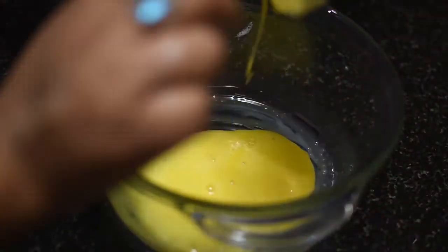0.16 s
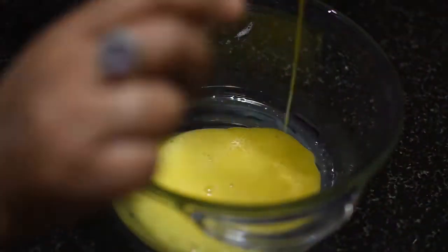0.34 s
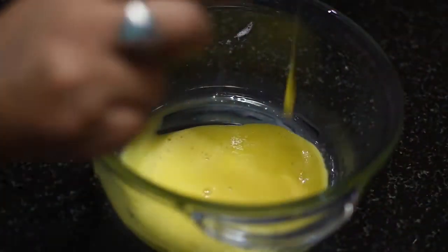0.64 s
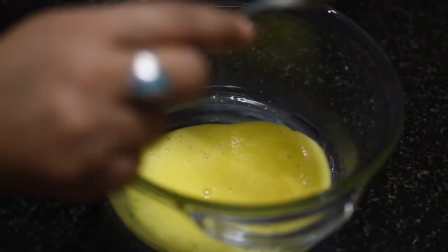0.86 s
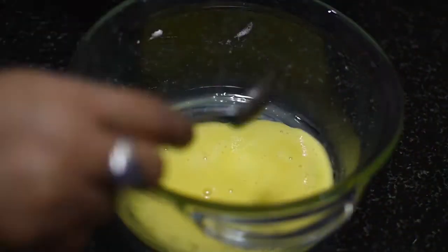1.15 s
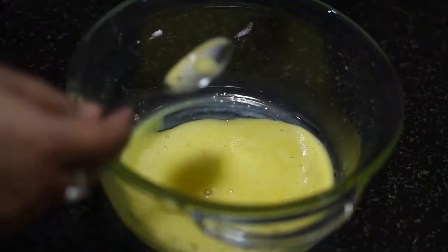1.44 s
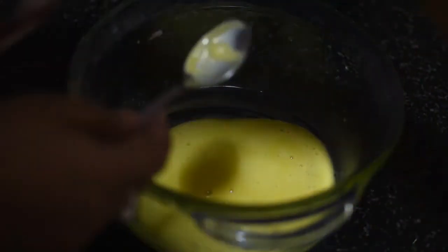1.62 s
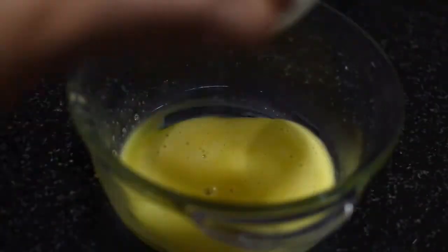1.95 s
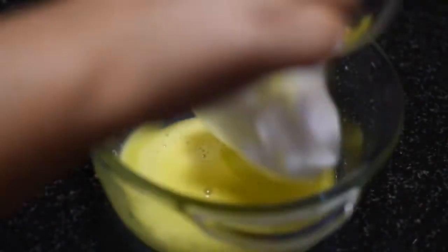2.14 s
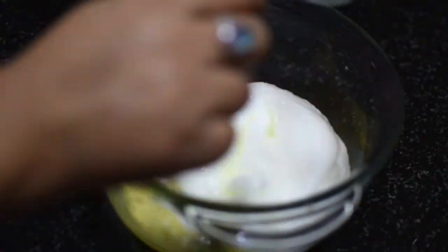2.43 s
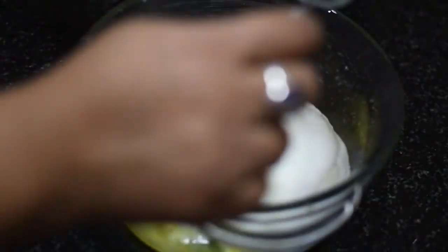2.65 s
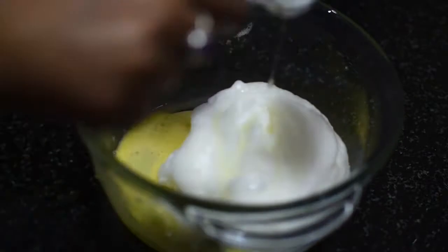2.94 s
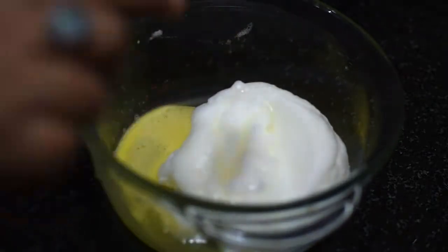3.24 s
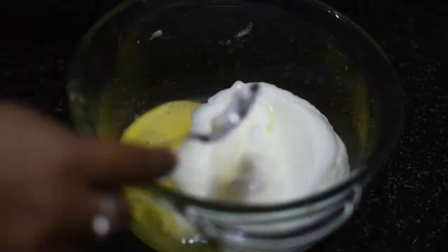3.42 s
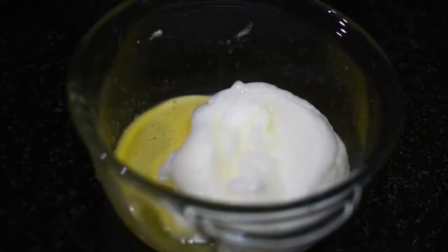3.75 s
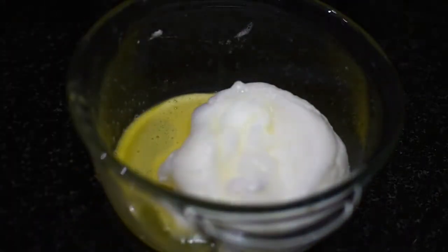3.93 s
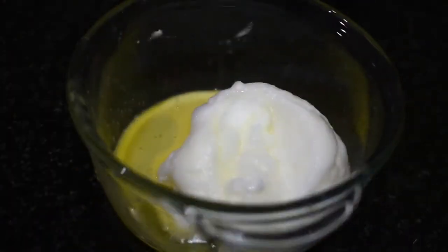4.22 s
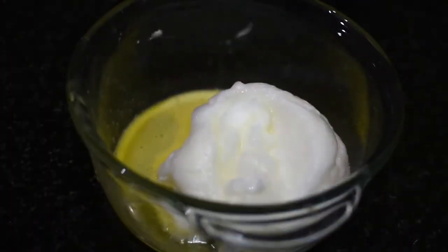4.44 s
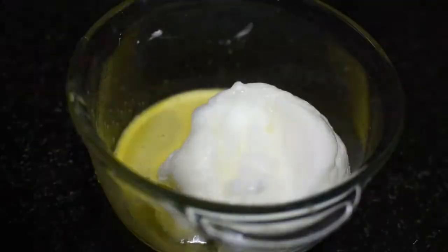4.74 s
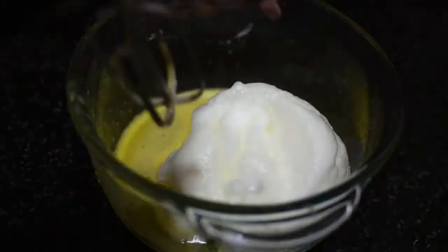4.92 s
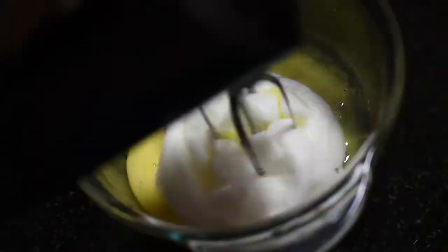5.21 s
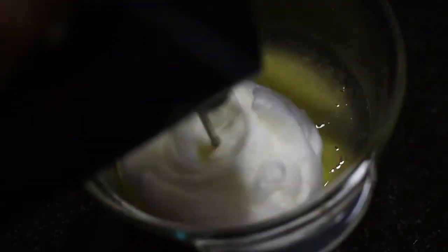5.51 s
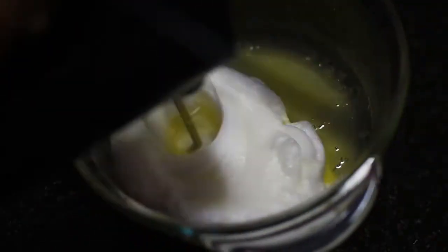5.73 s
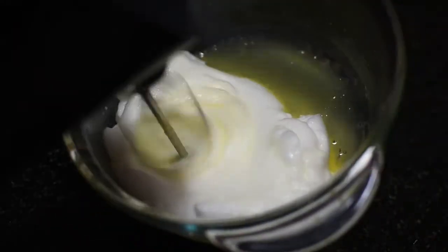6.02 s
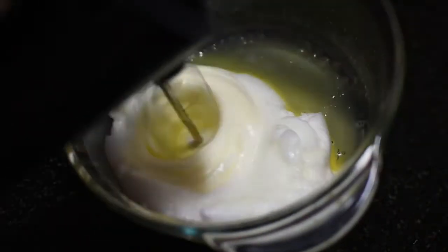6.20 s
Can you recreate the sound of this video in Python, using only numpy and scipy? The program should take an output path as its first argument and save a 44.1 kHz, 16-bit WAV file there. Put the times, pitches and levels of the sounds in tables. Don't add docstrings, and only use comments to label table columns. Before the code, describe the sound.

A hand mixer's buzz stops almost at once, followed by a dense, bright rattle of a spoon in a cup. After a near-quiet gap with small bowl taps come softer dish scrapes and clinks, then hard hollow beater knocks and ringing glass. The mixer finally revs up to a high whine. Close, dry kitchen sound over faint hum, chopped into tiny slices like fast-forward.

```python
import sys
import numpy as np
from scipy import signal
from scipy.fft import rfft, irfft, next_fast_len
from scipy.io import wavfile
from scipy.ndimage import uniform_filter1d, minimum_filter1d, map_coordinates

SR = 44100
rng = np.random.default_rng(int(sys.argv[2]) if len(sys.argv) > 2 else 0)


def gain_from_db(level_db):
    decades = np.asarray(level_db, float) / 20
    return 10 ** decades


def wav_record(signal):
    frames = np.transpose(np.atleast_2d(signal))
    bounded = np.clip(frames, -1, 1)
    quanta = np.round(bounded * 32767).astype(np.int16)
    wavfile.write(sys.argv[1], SR, quanta)


N = 280917

# start_s, level_db, body_db, sheen_db, loss_at_each_cut_db
CUP_TOUCHES = [(0.132, -33, 0, -1, 2), (0.143, -29, 2.5, -1, 14), (0.227, -33.5, -2, -9.5, 20.5),
               (0.287, -26, -9, -7.5, 11), (0.359, -31.5, 6.5, 3.5, 25.5), (0.396, -41.5, 6, -5, 9),
               (0.468, -33, 8.5, 7.5, 14.5), (0.568, -25, -1.5, -6.5, 9.5), (0.625, -27, -7, -5.5, 10),
               (0.712, -28, -10, -1, 0), (0.724, -25, -6, 0, 0), (0.734, -21, -5, 0, 0),
               (0.75, -25, -5, 0, 12), (0.801, -39, -1, -3, 3), (0.849, -28, 5, -1.5, 13),
               (0.935, -33, 2, 6, 13), (1.023, -40.5, 1.5, 2, 8), (1.109, -42.5, 1, -2.5, -4),
               (1.139, -38, 3, -1, 20.5), (1.199, -41, 3, -3, 4), (1.213, -37.5, 3.5, 3, 13.5),
               (1.287, -45.5, 3, 3.5, 12.5)]
DISH_TOUCHES = [(2.303, -51, 0, -5, 7), (2.434, -58, -5, -2, 3), (2.478, -47, 3, -3, 8),
                (2.523, -38, 1, -12, 11), (2.573, -37.5, 7, 3.5, 12), (2.656, -44, 3, 0.5, 9.6),
                (2.745, -40, 0.5, -2, 9.7), (2.82, -48, 1, -7, 2.5), (2.876, -48, 10, -20, 2),
                (2.901, -44.5, 9.5, -2, 10), (2.966, -41.5, 5.5, -8, 2.7), (3.016, -31, 2.5, -2, 13),
                (3.099, -38, 3, -0.5, 12), (3.186, -29, -3, -10, 9.1), (3.325, -33, 2, 6, 14.5),
                (4.069, -34.5, -7.5, 0.5, 12.6)]
BEATER_TOUCHES = [
    (4.158, -27.5, 8, -10.5, 2),
    (4.177, -18, 4.1, -17, 6.2),
    (4.248, -21, 5.7, -9, 9.8),
]
BOWL_TOUCHES = [(1.596, -36.5, 6, -15, 11.6), (1.683, -31.5, 11, -33, 15.6), (1.95, -52, 8, -12, 12),
                (4.534, -33, -5, -25, 41), (4.572, -45, 12, -5, 2), (4.602, -33, -2, -11, 11.2),
                (4.686, -44, 5, -17, 8), (4.732, -27, 6.5, -8, 2), (4.777, -28, 5.5, 1, 9.5)]
# pitch_hz, width_hz, level_db
CUP_RING = [(2970, 400, -1), (5540, 410, 2.5), (8600, 326, -13)]
DISH_RING = [(2460, 370, -6), (4150, 290, -10), (6650, 300, -7)]
BEATER_RING = [(800, 48, -1.5), (2335, 150, -17.5)]
BOWL_RING = [(1400, 44, -2.5)]
# pitch_hz, level_db (per Hz)
CUP_COLOUR = [(180, -50), (350, -42), (850, -25), (1150, -7.5), (4800, -4), (7300, -12), (9800, -12),
              (12000, -31.5)]
DISH_COLOUR = [(180, -55), (350, -36), (720, -23), (1100, -3.5), (2360, -4), (6000, -7.5), (9500, -13.5),
               (12000, -30)]
BEATER_COLOUR = [(120, -48), (200, -15), (1310, 3), (3300, -26.5), (5340, -27.5), (10000, -26),
                 (12000, -57)]
BOWL_COLOUR = [(120, -66), (200, -28), (1410, -10), (3660, -28.5), (9070, -33.5), (12000, -48)]
# start_s, pitch_hz, level_db
CUP_NOTES = [(0.142, 1127, -33), (0.227, 1120, -40), (0.286, 5760, -29), (0.316, 1127, -40),
             (0.357, 9460, -42), (0.468, 1587, -38), (0.468, 9450, -33), (0.625, 1363, -37),
             (0.625, 5520, -35.5), (0.625, 8500, -42), (0.801, 9500, -49), (0.848, 2875, -36),
             (0.933, 4900, -39), (0.286, 2870, -36), (0.625, 3100, -40), (0.567, 9500, -40),
             (0.933, 5500, -38), (0.712, 5550, -30), (0.712, 6760, -34), (0.712, 8300, -41),
             (0.73, 3980, -29), (0.738, 5600, -23.5), (0.738, 8400, -32.5), (0.848, 1370, -35.5),
             (0.847, 9460, -35), (1.022, 5300, -40), (1.109, 1366, -39), (1.109, 5540, -37.5),
             (1.213, 3300, -31), (1.213, 8470, -44), (1.286, 1350, -40.5), (1.286, 3180, -41)]
DISH_NOTES = [(2.876, 830, -40), (2.89, 1150, -41), (2.966, 850, -45), (2.966, 3900, -45),
              (2.966, 2300, -45), (3.097, 2000, -41), (3.097, 6900, -45), (3.186, 5200, -40),
              (3.186, 2300, -39), (4.068, 1000, -43), (2.82, 3900, -50), (2.573, 960, -36),
              (2.573, 2377, -25), (2.573, 6470, -41), (2.656, 6380, -46.5), (2.745, 2300, -39),
              (2.745, 4100, -43), (2.524, 2380, -40), (2.524, 6450, -48), (2.573, 4200, -42),
              (2.966, 8700, -57), (2.573, 9100, -46), (2.66, 1850, -46), (2.743, 6650, -37),
              (2.901, 5430, -49), (3.097, 1042, -43.5), (3.185, 1508, -38.5), (3.186, 6500, -38),
              (3.186, 4400, -38), (3.016, 3500, -37), (3.324, 1128, -32), (3.324, 4170, -31),
              (3.324, 1400, -34), (3.323, 6610, -27), (3.324, 2620, -34), (3.323, 9180, -35.5),
              (3.324, 5190, -34), (4.068, 6750, -35.5), (4.602, 5620, -40), (2.656, 10000, -49)]
BEATER_NOTES = [(4.158, 2400, -36), (4.184, 1300, -27), (4.177, 6830, -34.5), (4.177, 10300, -37.5),
                (4.207, 1140, -28), (4.247, 1100, -25), (4.27, 1250, -26), (4.187, 1330, -24),
                (4.247, 800, -28), (4.158, 800, -32), (4.29, 1133, -27.5)]
BOWL_NOTES = [(1.683, 1420, -32), (1.683, 500, -40), (1.596, 520, -46), (4.73, 860, -33), (4.73, 500, -36),
              (4.777, 460, -36), (4.777, 680, -38), (4.535, 4500, -51), (1.596, 1390, -39),
              (1.6, 5700, -50), (4.572, 1480, -36), (4.602, 6900, -52), (4.572, 5800, -50),
              (4.602, 3300, -43), (4.742, 8050, -36), (4.78, 5780, -34), (4.745, 1385, -23),
              (4.745, 3245, -31), (4.746, 5780, -22), (4.742, 7380, -35), (4.746, 8880, -31),
              (4.796, 1387, -17.5)]
# start_s, pitch_hz, level_db
LINGERING_NOTES = [(2.745, 2380, -36.5), (3.324, 4150, -32), (4.26, 4300, -29), (4.247, 6720, -31),
                   (4.772, 3250, -27), (4.796, 3260, -23), (4.776, 5790, -29), (4.78, 8880, -47),
                   (.625, 5530, -40), (.76, 3750, -42), (.76, 2870, -42)]
# start_s, peak_db, knock_hz, clink_hz, clink_db
BLOWS = [(0.131, 4, 1390, 4460, -14.5), (0.143, -9, 1140, 2760, 0), (0.285, -8, 1750, 5660, 0.5),
         (0.398, -17.5, 1930, 3370, 3.5), (0.466, -5, 1110, 3610, -6.5), (0.5663, -3, 1090, 2735, -7),
         (0.7405, -8, 1850, 4000, -2), (0.749, -11, 2800, 5600, 0), (1.143, -22, 1900, 5500, -4),
         (0.848, 2, 1238, 2875, -5), (2.575, -10, 2335, 6530, -6.5), (2.822, -21, 1100, 3880, -12),
         (2.902, -20, 869, 2550, -1.5), (3.014, -3, 1400, 2616, -4), (3.322, -8, 1410, 2660, -1),
         (4.177, 0, 1270, 2790, -10), (4.534, -32, 1480, 3000, -8), (4.6875, -20, 1380, 3190, -4),
         (4.749, -3, 1390, 3300, -11.5), (4.764, 2, 1400, 3240, -16.5), (5.137, -34, 1750, 2850, -11),
         (5.179, -30, 1730, 3150, -7.5)]
# start_s, pitch_hz, peak_db
CHIMES = [(.131, 3090, -18), (.131, 5577, -20), (.131, 6040, -22), (.131, 2035, -22), (.142, 1906, -20),
          (.2857, 2864, -10), (.2857, 4124, -16), (.2857, 5512, -12), (.2857, 2186, -20),
          (.2857, 8204, -23), (.2857, 1227, -21), (.397, 3919, -25), (.466, 9410, -17), (.466, 1453, -20),
          (.466, 4264, -22), (.466, 4759, -23), (.466, 6800, -26), (.5663, 1906, -18), (.5663, 3790, -19),
          (.5663, 3305, -20), (.5663, 9528, -18), (.5663, 1464, -19), (.848, 5136, -19), (.848, 3564, -20),
          (.848, 9421, -22), (1.684, 1389, -14), (1.684, 1023, -21), (1.684, 3165, -26), (1.684, 2239, -24),
          (2.574, 947, -15), (2.572, 1400, -23), (2.567, 10200, -36), (3.014, 1055, -18),
          (3.014, 1906, -17), (3.014, 3488, -19), (3.014, 3898, -22), (3.3224, 6740, -13),
          (3.3224, 4188, -15), (3.3224, 9227, -19), (3.3224, 1087, -18), (3.3224, 5308, -21),
          (4.177, 1755, -6), (4.177, 2358, -10), (4.177, 660, -4), (4.211, 1250, -12), (4.217, 1100, -14),
          (4.23, 1200, -13), (4.279, 1260, -10), (4.298, 1150, -20), (4.317, 1200, -22), (4.535, 3144, -31),
          (4.535, 3865, -35), (4.749, 5782, -18), (4.749, 8882, -21), (4.733, 1560, -18), (4.764, 883, -17),
          (4.764, 2250, -17), (.739, 4410, -14)]
# start_s, peak_db, pitch_hz, t60_s
THUDS = [(0.368, -30, 130, 0.13), (0.89, -31, 131, 0.15), (1.95, -33, 178, 0.11), (2.48, -31, 334, 0.2),
         (2.497, -30, 320, .13), (4.174, -16, 183, 0.033), (4.597, -30.5, 274, 0.13),
         (4.776, -23, 285, 0.16), (4.735, -22, 520, .2), (2.6, -38, 110, .2), (2.88, -36, 400, .12)]
# start_s, peak_db, length_s
JOLT = (4.176, -26, .005)
# time_s, turns_per_s
SHAFT_SPEED = [(5.79, 58), (5.814, 125), (5.834, 160), (5.837, 250), (5.881, 267), (5.883, 306),
               (5.923, 314), (5.925, 330), (5.976, 348), (6.03, 359.5), (6.108, 368.3), (6.2, 372.5),
               (6.37, 379)]
# on_s, off_s, gear_noise_db, whine_db, octave_db, shaft_tone_db
MIXER_RUNS = [
    (-.01, .097, -16.5, -29, -36.5, -19.5),
    (5.789, 6.4, -17.2, -24.5, -50, -22.5),
]
# pitch_hz, width_hz, level_db
SHELL_RING = [(600, 50, -4), (748, 45, -4), (1250, 67, -1.5), (1750, 92, -1), (2335, 70, 0),
              (2880, 230, -5.5)]
# pitch_hz, level_db (per Hz)
GEAR_COLOUR = [(88, -70), (150, -47), (295, -10.5), (367, -10.5), (464, 0), (753, -0.5), (2040, -1.5),
               (2330, 1.5), (5000, -16.5), (6500, -42), (11000, -120)]
HISS_COLOUR = [(2240, -40.5), (3800, -8), (4340, -10.5), (9160, -24.5), (11000, -31.5), (11900, -48),
               (15500, -65), (22000, -120)]
# pitch_hz, width_hz, lift_db
VENT = (5800, 2200, 22)
GRILLE = (2500, 2200, 18)
SIDE_TONES_DB = (-20, -14)
# pitch_hz, level_db, t60_s
SWITCH_JOLT = [
    (770, 1.5, 0.1),
    (1059, -11, 0.079),
    (1290, -11, 0.061),
]
# start_s, pitch_hz, level_db
SHELL_NOTES = [(5.792, 620, -25), (5.83, 2920, -22), (5.794, 1500, -32), (5.794, 2950, -37),
               (5.794, 3900, -43), (5.812, 1250, -29), (5.794, 2370, -32), (5.856, 5250, -30),
               (5.836, 1790, -24), (5.856, 600, -27), (5.884, 1245, -28)]
# pitch_hz, level_db (per Hz)
HUM_COLOUR = [(12, -50.5), (25, -30.5), (51, -11), (114, -2), (184, 1), (254, -5), (300, 0), (520, -1.5),
              (1560, -6), (4000, -19.5), (7500, -35), (12000, -46.5)]
# pitch_hz, likeness (0 to 1)
LIKENESS = [(60, 1), (170, 0.98), (490, 0.99), (1400, 0.98), (4010, 0.89), (11500, 0.57)]

FULL_SPEED = 386.5
HISS_DB = -21.5
HISS_DB_PER_OCTAVE, TONE_DB_PER_OCTAVE = 11, 26.5
STRAIN_DB, STALL_DB = 32, 59
INRUSH_DB = 3
BLOW_T60, CHIME_T60 = 0.032, 0.04
BODY_SPARED, SHEEN_EXTRA = 0.14, 0.191
FIRST_CUT_S, SLICE_S, FADE_S = 0.094, 0.04417, 0.003

TIME = np.arange(N) / SR
SHORT_TIME = np.arange(SR // 5) / SR
CUTS_PASSED = uniform_filter1d(np.floor((TIME - FIRST_CUT_S) / SLICE_S), size=round(FADE_S * SR))


def unit(x):
    return x / np.sqrt(np.mean(x ** 2) + 1e-20)


def along(points, hz):
    f, v = np.transpose(points)
    return np.interp(np.log(hz + 1), np.log(f + 1), v)


def wobble(rate):
    knots = rng.standard_normal(int(N * rate / SR) + 4)
    return map_coordinates(knots, [TIME * rate])


def colour_gain(colour):
    return lambda hz: gain_from_db(along(colour, hz))


def resonant(colour, ring, ring_db):
    def gain(hz):
        power = gain_from_db(2 * along(colour, hz))
        for centre, width, db in ring:
            power = power + gain_from_db(2 * (db + ring_db)) / (1 + (2 * (hz - centre) / width) ** 2) ** 2
        return np.sqrt(power)
    return gain


def rush(gain):
    m = next_fast_len(N + 8192)
    hz = np.fft.rfftfreq(m, 1 / SR)
    turn = np.arccos(np.clip(along(LIKENESS, hz), -1, 1)) / 2
    spectrum = rfft(rng.standard_normal((2, m))) * gain(hz)
    mid, side = irfft(spectrum * [np.cos(turn), np.sin(turn)], m)[:, :N]
    return unit(np.array([mid + side, mid - side]))


def patchy(x, depth_db):
    z = signal.stft(x, nperseg=512)[2]
    field = uniform_filter1d(rng.standard_normal(z.shape[1:]), size=4, axis=0)
    field = uniform_filter1d(field, size=8, axis=1)
    gain = unit(gain_from_db(depth_db * unit(field)))
    return signal.istft(z * gain, nperseg=512)[1][:, :N]


def damped(hz, db, t60, t):
    return gain_from_db(db - 60 * t / t60) * np.sin(2 * np.pi * hz * t)


def add(track, s, sound):
    i = round(s * SR)
    track[..., i:i + sound.shape[-1]] += sound


def ageing(s, until, drift=0.39):
    i = round((s - FADE_S / 2) * SR)
    n = round((min(until - s, 5 * SLICE_S) + FADE_S) * SR)
    t = TIME[:n]
    cuts = np.clip(CUTS_PASSED[i:i + n] - CUTS_PASSED[i + round(2 * FADE_S * SR)], 0, None)
    window = np.sqrt(np.clip(np.minimum(t, t[-1] - t) / FADE_S, 0, 1))
    return window, cuts + drift * t / SLICE_S


def clatter(touches, colour, ring, ring_db, rattle_db):
    def over(hz, edge_hz):
        return 1 / np.sqrt(1 + (edge_hz / (hz + 1)) ** 12)
    m = next_fast_len(N)
    hz = np.fft.rfftfreq(m, 1 / SR)
    spectrum = rfft(patchy(rush(resonant(colour, ring, ring_db)), depth_db=2.5), m)
    bands = over(1930, hz), over(hz, 2390) * over(4090, hz), over(hz, 4650)
    pace = np.array([[1 - BODY_SPARED], [1], [1 + SHEEN_EXTRA]])
    levels = np.zeros((3, N))
    ends = [touch[0] for touch in touches[1:]] + [7]
    for (s, db, body_db, sheen_db, loss_db), until in zip(touches, ends):
        window, age = ageing(s, until)
        band_db = db + np.array([[body_db], [0], [sheen_db]])
        add(levels, s - FADE_S / 2, window * gain_from_db(band_db - loss_db * pace * age))
    rattle = unit(gain_from_db(rattle_db * wobble(150)))
    return rattle * sum(level * unit(irfft(spectrum * band, m)[:, :N])
                        for level, band in zip(levels, bands))


def singing(notes, width_hz, steady, loss_db):
    track = np.zeros((2, N))
    all_knots = rng.standard_normal((len(notes), 4, 240))
    for (s, hz, db), knots in zip(notes, all_knots):
        window, age = ageing(s, 7, drift=0.3)
        t = TIME[:len(age)]
        a, b, c, d = (map_coordinates(k, [t * width_hz * (hz / 2500) ** 0.4 + 2]) for k in knots)
        apart = np.sqrt(np.clip(1 - along(LIKENESS, hz), 0, 1) / 2)
        shake = steady + np.sqrt(1 - steady ** 2) * (a + 1j * b) * 0.73
        shake = shake + apart * (c + 1j * d) * np.array([[0.75], [-0.75]])
        tone = np.sqrt(2) * np.real(shake * np.exp(2j * np.pi * hz * t))
        add(track, s - FADE_S / 2, window * gain_from_db(db + 3.5 - loss_db * age) * tone)
    return track


def cup():
    return (clatter(CUP_TOUCHES, CUP_COLOUR, CUP_RING, ring_db=2, rattle_db=2.2)
            + singing(CUP_NOTES, width_hz=250, steady=0.3, loss_db=18.5))


def dish():
    return (clatter(DISH_TOUCHES, DISH_COLOUR, DISH_RING, ring_db=5.5, rattle_db=2.45)
            + singing(DISH_NOTES, width_hz=280, steady=0.3, loss_db=19.5))


def beaters():
    return (clatter(BEATER_TOUCHES, BEATER_COLOUR, BEATER_RING, ring_db=4, rattle_db=0.5)
            + singing(BEATER_NOTES, width_hz=169, steady=0.55, loss_db=14))


def bowl():
    return (clatter(BOWL_TOUCHES, BOWL_COLOUR, BOWL_RING, ring_db=0.5, rattle_db=1.5)
            + singing(BOWL_NOTES, width_hz=105, steady=0.55, loss_db=18))


def lingering_notes():
    return singing(LINGERING_NOTES, width_hz=90, steady=0.7, loss_db=11)


def blows():
    track, t = np.zeros((2, N)), SHORT_TIME
    crack = rush(colour_gain(CUP_COLOUR))
    rise = (1 - np.exp(-t / 0.0002)) * (1 + 0.8 * np.exp(-t / 0.0012))
    for s, db, knock_hz, clink_hz, clink_db in BLOWS:
        knock = damped(knock_hz, -8, BLOW_T60, t)
        clink = damped(clink_hz, clink_db - 8.5, 0.96 * BLOW_T60, t)
        crack_fade = gain_from_db(clink_db - 8 - 60 * t / (0.82 * BLOW_T60))
        burst = crack_fade * crack[:, round(s * SR):][:, :len(t)]
        add(track, s, gain_from_db(db) * rise * (knock + clink + burst))
    for s, hz, db in CHIMES:
        add(track, s, rise * damped(hz, db, CHIME_T60, t))
    no_bass = signal.butter(4, 850, "high", fs=SR, output="sos")
    return signal.sosfilt(no_bass, track)


def counter():
    track, t = np.zeros((2, N)), SHORT_TIME
    jolt_s, jolt_db, length_s = JOLT
    add(track, jolt_s, -gain_from_db(jolt_db) * np.sin(np.pi * np.clip(t / length_s, 0, 1)) ** 2)
    shuffle = unit(1.9 + wobble(120))
    for s, db, hz, t60 in THUDS:
        slab = damped(hz, db, t60, t)
        slab += damped(0.5 * hz, db - 14, t60, t)
        slab += damped(1.45 * hz, db - 3, t60, t)
        add(track, s, (1 - np.exp(-t / 0.0064)) * slab * shuffle[round(s * SR):][:len(t)])
    return track


def missing_speed():
    s, turns_per_s = np.transpose(SHAFT_SPEED)
    lack = np.log(np.clip(1 - turns_per_s / FULL_SPEED, 1e-3, 0.95))
    return np.exp(np.interp(TIME, s, lack)) * (TIME >= s[0])


def mixer_levels(missing):
    speed, octaves = FULL_SPEED * (1 - missing), np.log2(1 - missing)
    lift_db = sum(db / (1 + (2 * (20 * speed - hz) / width) ** 2) for hz, width, db in (VENT, GRILLE))
    growth = gain_from_db([STRAIN_DB * missing - STALL_DB * missing ** 2,
                  HISS_DB_PER_OCTAVE * octaves,
                  TONE_DB_PER_OCTAVE * octaves,
                  INRUSH_DB * missing,
                  INRUSH_DB * missing + lift_db])
    levels = np.zeros((5, N))
    for on, off, gear_db, whine_db, octave_db, tone_db in MIXER_RUNS:
        running = np.clip(np.minimum(TIME - on, off - TIME) / 0.005, 0, 1) ** 2
        levels += running * growth * gain_from_db([[gear_db], [HISS_DB], [tone_db], [whine_db], [octave_db]])
    return np.vstack([levels, levels[[2, 4]] * gain_from_db(SIDE_TONES_DB)[:, None]])


def gear_noise(pulse):
    noise = patchy(rush(resonant(GEAR_COLOUR, SHELL_RING, ring_db=6.5)), depth_db=1)
    return unit(pulse * gain_from_db(wobble(90) + 0.4 * wobble(25)) * noise)


def air_hiss(pulse):
    return unit(pulse * patchy(rush(colour_gain(HISS_COLOUR)), depth_db=1.5))


def shaft_tone(turns):
    slips = rng.standard_normal((2, 160)) * (np.arange(160) > 130)
    landing = gain_from_db(1.2 * slips[0]) * np.exp(1j * 0.9 * slips[1].cumsum())
    slip = np.interp(uniform_filter1d(CUTS_PASSED, size=500) + 3, np.arange(160), landing)
    return np.sqrt(2) * gain_from_db(1.4 * wobble(60)) * np.imag(slip * np.exp(2j * np.pi * turns))


def motor_line(turns, cycles_per_turn, waver_db):
    return np.sqrt(2) * gain_from_db(waver_db * wobble(40)) * np.sin(2 * np.pi * cycles_per_turn * turns)


def switch_jolt():
    track, t = np.zeros((2, N)), SHORT_TIME
    add(track, 5.797, (1 - np.exp(-t / 0.0056)) * sum(damped(*note, t) for note in SWITCH_JOLT))
    return track


def mixer():
    missing = missing_speed()
    speed = FULL_SPEED * (1 - missing)
    judder = 0.0021 + 0.04 * np.clip(1 - speed / 370, 0, 1) ** 2
    turns = np.cumsum(speed * (1 + judder * wobble(120))) / SR
    pulse = unit(1 + 0.057 * np.cos(2 * np.pi * turns))
    gear, hiss, tone, *whines = mixer_levels(missing)
    kinds = (10, 2.2), (20, 1.5), (2, 3), (21, 4)
    lines = sum(level * motor_line(turns, *kind) for level, kind in zip(whines, kinds))
    glides = 1.0 * (np.gradient(speed) * SR < 6000)
    unbroken = uniform_filter1d(minimum_filter1d(glides, size=131), size=65)
    track = gear * gear_noise(pulse) + hiss * air_hiss(pulse)
    track = track + tone * shaft_tone(turns) + unbroken * lines
    return track + switch_jolt() + singing(SHELL_NOTES, width_hz=143, steady=0.27, loss_db=22)


def kitchen():
    def low(hz):
        return 1 / (1 + (hz / 220) ** 4)
    hum = colour_gain(HUM_COLOUR)
    rumble = unit(gain_from_db(2 * wobble(4)) * rush(lambda hz: hum(hz) * low(hz)))
    air = rush(lambda hz: hum(hz) * (1 - low(hz)))
    return gain_from_db(-44 + wobble(15)) * air + gain_from_db(-53.5) * rumble


def scene():
    crockery = cup() + dish() + beaters() + bowl() + lingering_notes()
    return (crockery + blows() + counter() + mixer() + kitchen()) * gain_from_db([[0.15], [-0.15]])


def band_limit(x):
    return signal.sosfilt(signal.butter(12, 11900, fs=SR, output="sos"), x)


def record(dry):
    top = signal.butter(16, 11600, fs=SR, output="sos")
    mix = np.clip(signal.sosfilt(top, dry), -1, 1)
    return band_limit(mix)


dry = scene()
out = record(dry)
wav_record(out)
```